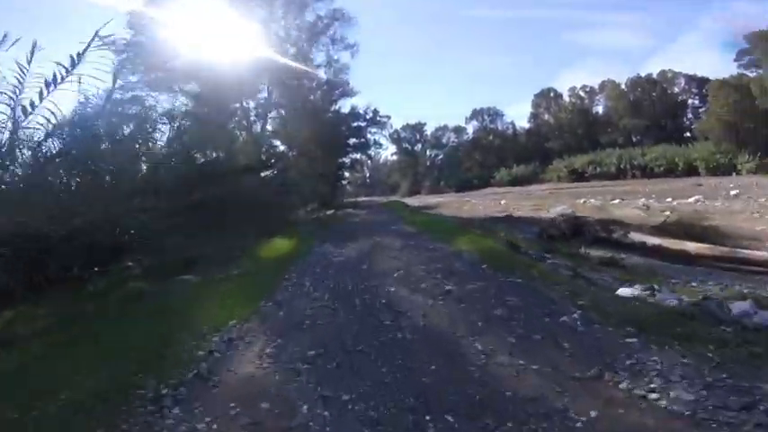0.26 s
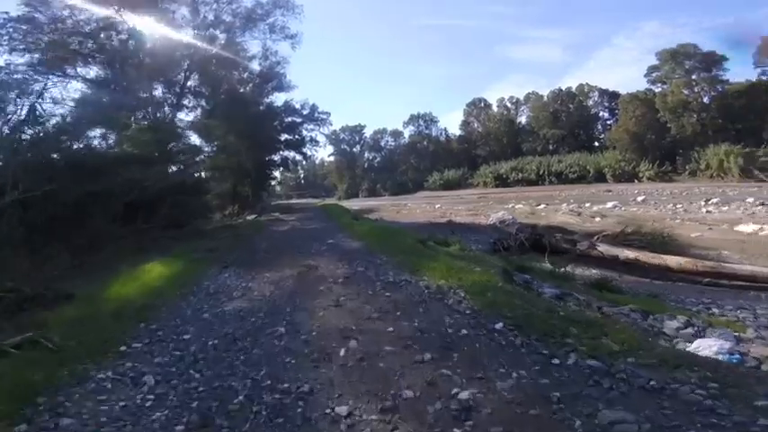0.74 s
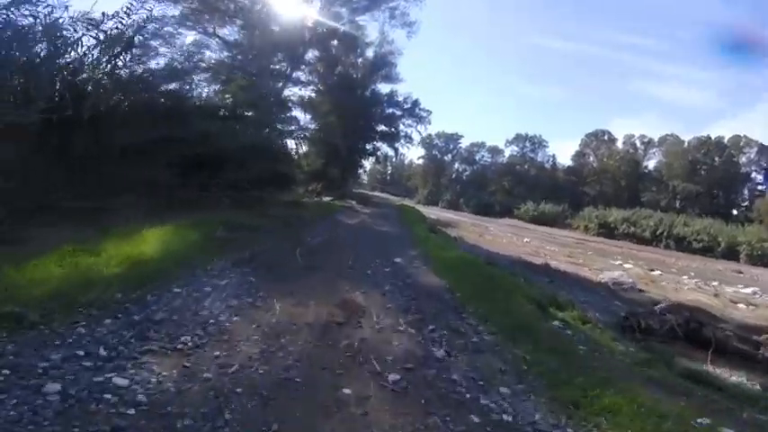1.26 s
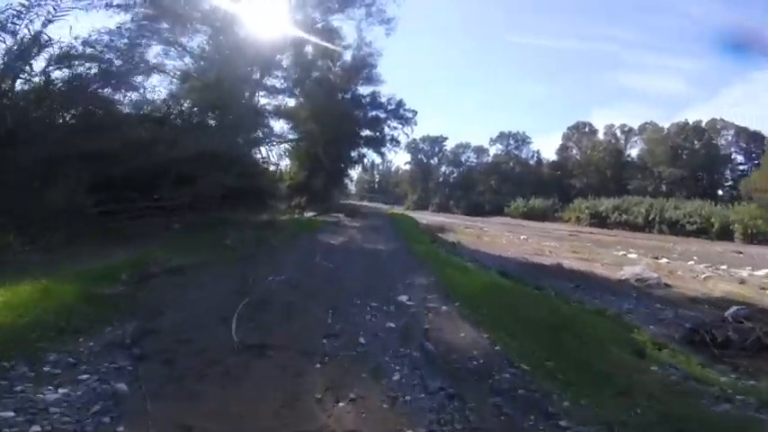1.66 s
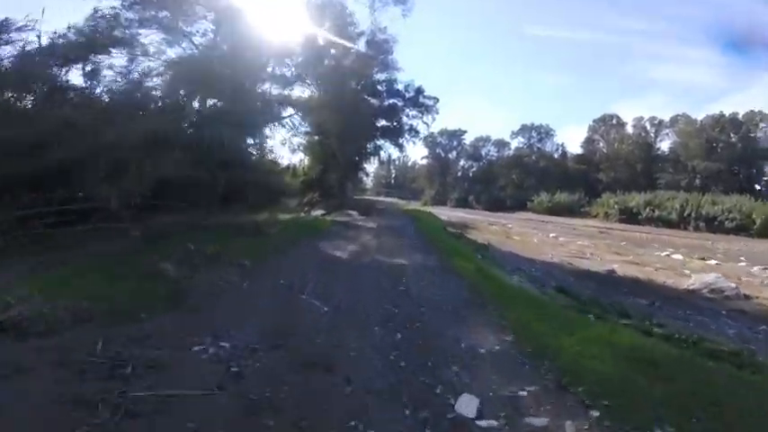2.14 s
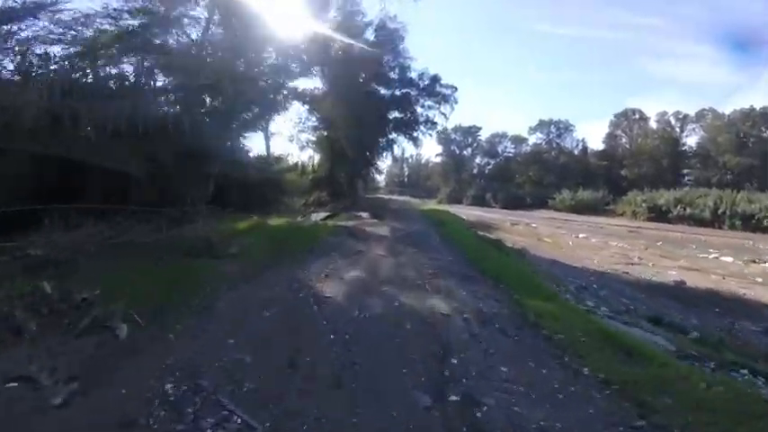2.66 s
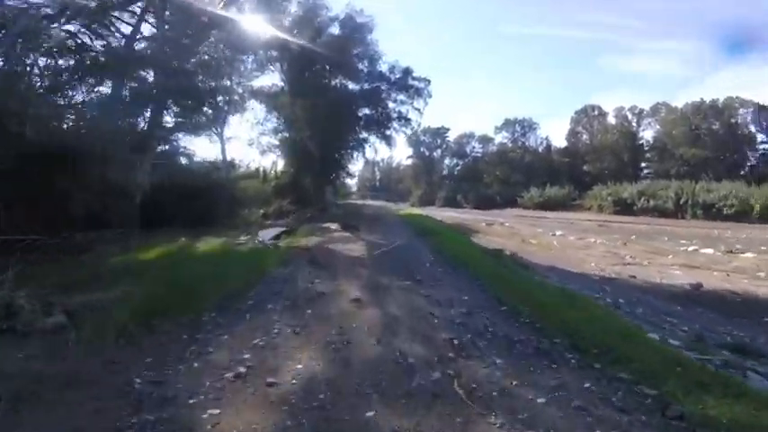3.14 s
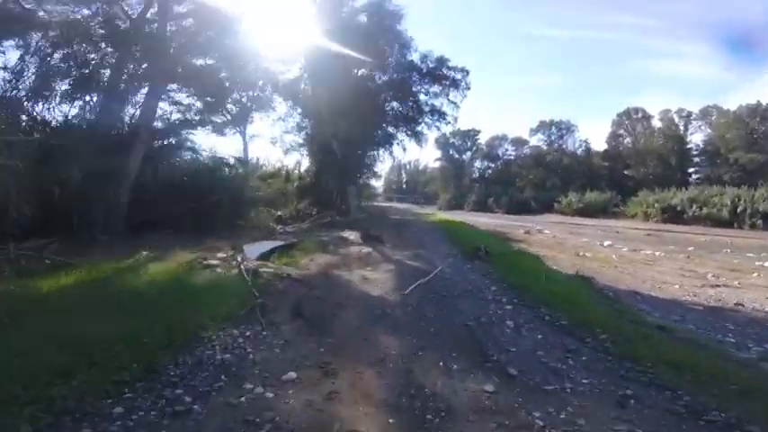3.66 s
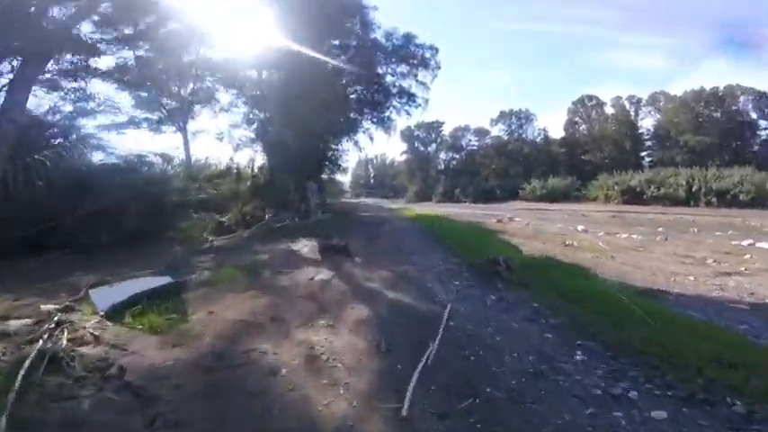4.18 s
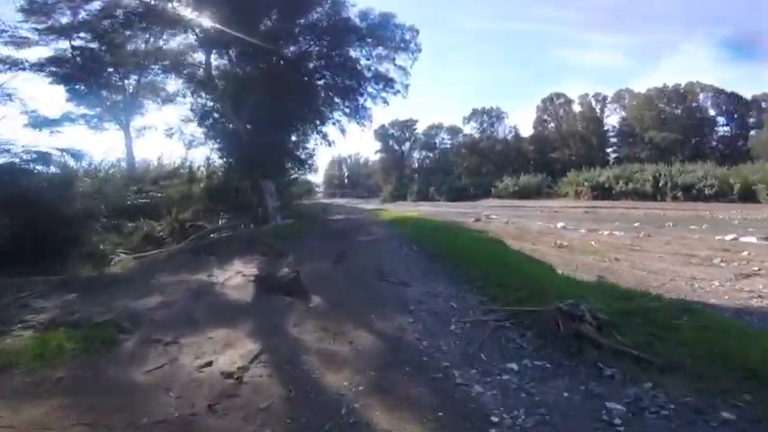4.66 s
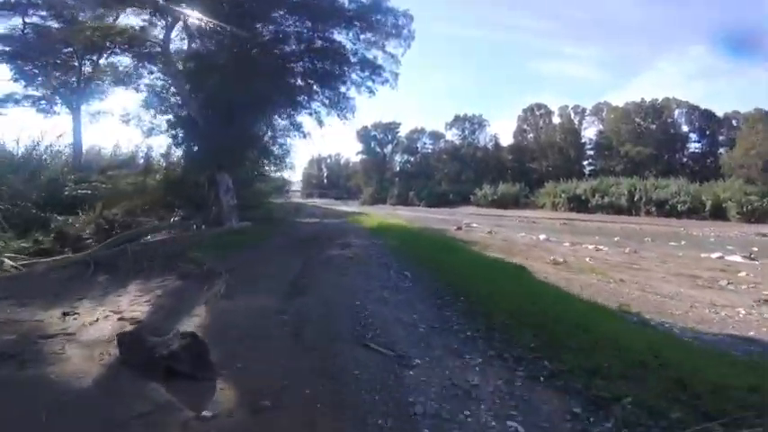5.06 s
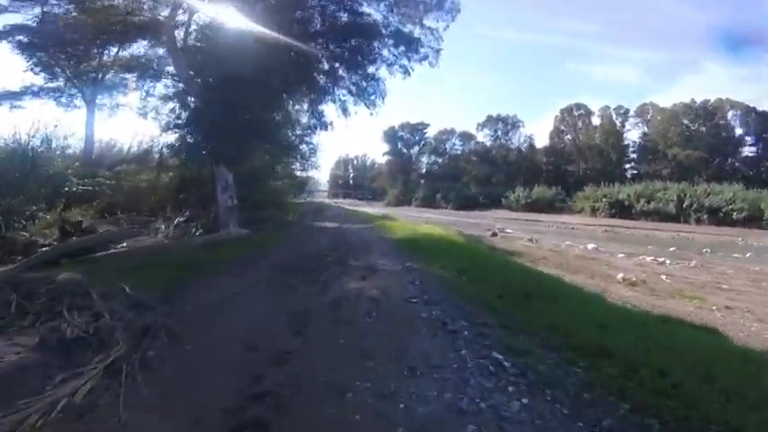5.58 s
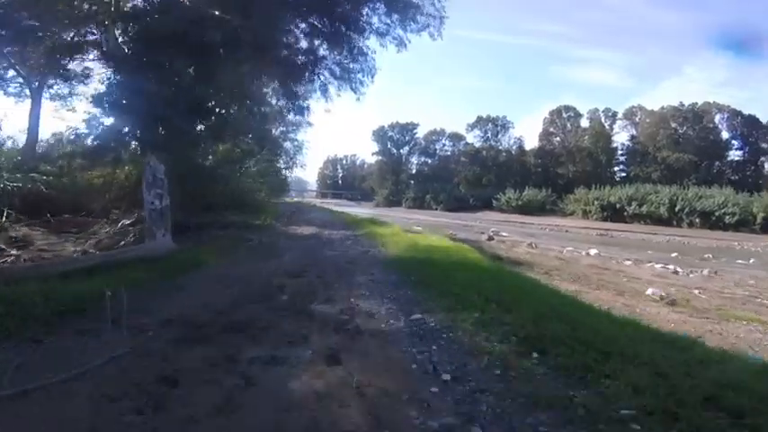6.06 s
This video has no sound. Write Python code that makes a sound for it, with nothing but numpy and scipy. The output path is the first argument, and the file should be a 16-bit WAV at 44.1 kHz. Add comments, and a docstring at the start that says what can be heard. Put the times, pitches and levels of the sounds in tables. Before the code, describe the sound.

A bicycle rolls along a gravel track, heard close up from a microphone fixed to the bike. From start to finish, wind buffets the microphone in low, uneven gusts, the strongest at about 0.3 and 2.5 seconds. The shaking bike rumbles underneath, with a faint hiss and crackle of grit from the tyres. For the first 3.3 seconds the wheels thud often on big stones, in irregular clusters. Hollow plastic knocks, light rattles of loose parts and small clinks of stones on metal are scattered among the thuds. Then the track turns to dirt and the bumps thin out, while the rumble and occasional knocks continue. At about 4.4 seconds comes one loud, sharp tick and a thud, and the rumble briefly dips. A clear knock at 5.6 seconds leads into a last run of bumps and clinks, lasting until about 6.3 seconds.

```python
"""A bicycle rolls along a gravel track, heard by a small microphone clamped to its frame.
From the start, wind buffets the microphone, the fork swings, stones shake the frame and the tyres hiss.
For three seconds big stones thud often, while loose parts rattle, the microphone's housing knocks and
stones clink on metal. Then the track turns to dirt and the bumps thin out. A loud tick comes at 4.4 s,
and a last run of bumps fills the final half second."""
import sys
import numpy as np
from scipy import signal
from scipy.io import wavfile
from scipy.ndimage import uniform_filter1d

SR = 44100
rng = np.random.default_rng(int(sys.argv[2]) if len(sys.argv) > 2 else 0)


def file_out(sig):
    """Save sig as 16-bit WAV at sys.argv[1]."""
    # one column per channel
    cols = np.atleast_2d(sig).T
    # limit, then scale
    lim = np.clip(cols, -1, 1)
    pcm = np.round(lim * 32767).astype(np.int16)
    wavfile.write(sys.argv[1], SR, pcm)


N = 278268


def amp(db):
    """Turn decibels into a number to multiply by."""
    return 10 ** (np.asarray(db) / 20)


def unit(x):
    """Scale a sound so that its average power is 1."""
    return x / np.sqrt(np.mean(x ** 2) + 1e-20)


def curve(rows):
    """Join (time, value) points with straight lines."""
    return np.interp(np.arange(N) / SR, *np.transpose(rows))


def clicks_at(times_s, sizes):
    """Silence with one click at each given time."""
    clicks = np.zeros(N)
    clicks[(times_s * SR).astype(int)] = sizes
    return clicks


def fade(clicks, decay_s):
    """Give each click a tail that dies away."""
    return signal.lfilter([1], [1, -np.exp(-1 / (decay_s * SR))], clicks + 1e-18)


def resonate(x, hz, width_hz):
    """Keep the sound near one pitch; a narrower width rings longer."""
    r = np.exp(-np.pi * width_hz / SR)
    feedback = [1, -2 * r * np.cos(2 * np.pi * hz / SR), r * r]
    return signal.lfilter(np.array([1, 0, -1]) * (1 - r * r) / 2, feedback, x)


def ring(clicks, hz, ring_s):
    """Each click starts a pure tone that falls by 60 dB in ring_s."""
    r, w = amp(-60 / (ring_s * SR)), 2 * np.pi * hz / SR
    return signal.lfilter([0, np.sin(w)], [1, -2 * r * np.cos(w), r * r], clicks + 1e-18)


def keep(x, hz, kind, order=2):
    """Keep the "low" part, the "high" part or one "band" of a sound."""
    return signal.sosfilt(signal.butter(order, hz, kind, fs=SR, output="sos"), x)


def drift(rate_hz):
    """A smooth random wobble, about 1 in size."""
    return unit(keep(rng.standard_normal(N + SR), rate_hz, "low")[SR:])


def grains(per_s, spread_db):
    """Random clicks, a few much larger than the rest."""
    sizes = amp(spread_db * np.minimum(rng.exponential(1, N), 4.0)) * rng.choice([-1, 1], N)
    return sizes * (rng.random(N) < per_s / SR) + 1e-18


def even(x, window_s):
    """Even out slow changes in loudness."""
    window = int(window_s * SR)
    power = uniform_filter1d(uniform_filter1d(x ** 2, window), window)
    return x / np.sqrt(power + 0.018 * np.mean(power))


def swells(base_db, events):
    """A level in dB with smooth swells added; a swell's length is taken at half its height."""
    t, power = np.arange(0, N + 64, 64) / SR, 0
    for s, db, length_s in events:
        power = power + amp(2 * db) * 0.5 ** (2 * (2 * (t - s) / length_s) ** 2)
    return 10 * np.log10(amp(2 * base_db) + np.interp(np.arange(N) / SR, t, power))


def crunch(events, below_db, decay_s, high_hz):
    """Each blow cracks and scatters grit: a rough burst that dies quickly."""
    times_s, level_db = np.transpose(events)[:2]
    loudness = fade(clicks_at(times_s, amp(level_db - below_db)), decay_s)
    burst = loudness * unit(grains(9000, spread_db=9.5))
    return keep(keep(burst, high_hz, "low", order=3), 600, "high")


def notes(events, tones, rise_s, spread_db):
    """Each hit is a few clashing tones that swell and die; all but the first vary from hit to hit."""
    out, t = np.zeros(N), np.arange(SR // 20) / SR
    shape = (t / rise_s) ** 2 * np.exp(2 - 2 * t / rise_s)
    chance = rng.standard_normal((len(events), len(tones), 2))
    chance[:, 0] = 0
    for (s, level_db, hz), luck in zip(events, chance):
        note = 0
        for (ratio, db), (louder, higher) in zip(tones, luck):
            tone_hz = hz * ratio * (1 + 0.13 * higher)
            note = note + amp(db + spread_db * louder) * np.sin(2 * np.pi * tone_hz * t)
        at = int(s * SR)
        out[at:at + len(t)] += (amp(level_db) * note * shape)[:N - at]
    return out


# The top of each gust: t/s, level/dB
GUSTS = [(0.333, -15), (0.647, -24.5), (0.953, -20.5), (1.545, -18.5), (2.099, -23.5), (2.504, -16.5),
         (3.123, -32), (3.206, -19), (3.838, -25.5), (4.337, -22), (5.524, -24), (5.685, -21),
         (5.791, -22.5), (6.284, -20.5)]

def wind(rough_db, patches_db):
    """Wind presses on the microphone's opening in low, uneven lumps."""
    gusts = [(s, db, 0.097) for s, db in GUSTS]   # each lasts 0.097 s
    level_db = swells(-27.5 + 0.27 * rough_db, gusts) + patches_db
    rumble = keep(rng.standard_normal(N), 67.7, "low", order=4)
    return amp(level_db) * even(keep(rumble, 15.0, "high"), window_s=0.047)


FORK_HZ, FORK_WIDTH_HZ = 76.97, 17
# The top of each big swing of the fork: t/s, level/dB, length/s
FORK_SWINGS = [(0.337, -18.5, 0.092), (0.809, -16, 0.041), (0.994, -18.5, 0.08), (1.196, -17, 0.029),
               (1.422, -14, 0.032), (1.539, -14, 0.039), (2.412, -15.5, 0.049), (2.818, -22, 0.11),
               (3.533, -22, 0.14), (3.78, -21, 0.033), (5.366, -15.5, 0.043), (5.626, -21, 0.019),
               (5.878, -15.5, 0.034), (5.99, -19.5, 0.058)]

def fork(rough_db):
    """Kicked by the ground, the fork that holds the front wheel swings at its own low pitch."""
    level_db = swells(-30.5 + rough_db, FORK_SWINGS)
    kicks = resonate(grains(300, spread_db=3.0), FORK_HZ, FORK_WIDTH_HZ)
    return amp(level_db) * even(resonate(kicks, FORK_HZ, 25), window_s=0.088)


# The pitches at which the frame rings: f/Hz, width/Hz, level/dB
FRAME_TONES = [(136, 46.6, -2), (171.2, 30.9, 2.5), (220.4, 42.7, -4), (298.5, 79.8, -6.5),
               (393.3, 112.4, -13.5), (644, 44, -19), (770, 700, -31)]

def frame(force):
    """A push rings all the frame's tones at once, every second one upside down."""
    return sum((-1) ** k * amp(db) * resonate(force, hz, width_hz)
               for k, (hz, width_hz, db) in enumerate(FRAME_TONES))


def gravel(shake_db):
    """Small stones push softly on the tyres, in clumps, and make the frame rumble."""
    stones = grains(700 * amp(3.4 * drift(15)), spread_db=2.0)
    pushes = keep(stones, 996, "low", order=4)
    return amp(shake_db + 2.5) * even(frame(pushes), window_s=0.59)


def tread(level_db):
    """The knobs of the tyre hum evenly through the frame's two highest tones."""
    noise = rng.standard_normal(N)
    hum = sum(amp(db) * resonate(resonate(noise, hz, width_hz), hz, 2 * width_hz)
              for hz, width_hz, db in FRAME_TONES[5:])
    return amp(level_db) * unit(hum)


# How strong the hiss is from low to high: f/Hz, level/dB
HISS_COLOUR = [(1200, -7.5), (1410, -6), (4470, -20), (5040, -26), (6530, -24.5), (10100, -39.5),
               (12000, -62), (13000, -51)]

def hiss(level_db):
    """Fine grit hisses under the tyres, flickering in bands half an octave wide."""
    out, shared_flicker = 0, drift(20)
    edges_hz = 1100 * 2 ** np.arange(0, 4, 0.5)
    noise = rng.standard_normal((2, N))
    grit = noise + 0.11 * unit(grains(500 * amp(2.0 * drift(14)), spread_db=2.5))
    hz, db = np.transpose(HISS_COLOUR)
    for k, (low, high) in enumerate(zip(edges_hz, edges_hz[1:])):
        band_db = np.interp(np.log(low * high) / 2, np.log(hz), db)
        flicker_db = 1.2 * shared_flicker + 1.3 * drift(40)
        out = out + amp(band_db + flicker_db) * keep(grit[k % 2], [low, high], "band")
    hollow = amp(6) * resonate(out, hz=6600, width_hz=580)   # the air just inside the opening rings
    return amp(level_db) * unit(out + hollow)


def pebbles(shake_db):
    """Small stones crackle in clusters under the tyres, each ringing very briefly."""
    cluster = amp(5 * drift(12))
    rings = sum(ring(grains(70 * cluster, spread_db=5.5), hz, ring_s=5.2 / hz)
                for hz in np.geomspace(1400, 4200, num=8))
    return amp(shake_db - 41) * unit(keep(keep(rings, 3200, "low"), 1400, "high"))


# A wheel hits a big stone; rounder stones give a lower f and a softer thud: t/s, level/dB, f/Hz
BUMPS = [(0.0222, -8, 270), (0.2236, -19.5, 600), (0.2387, -13.5, 245), (0.2461, -12, 250),
         (0.2531, -12, 214), (0.2639, -13, 200), (0.31, -17.5, 354), (0.316, -11.5, 444),
         (0.3782, -18.5, 388), (0.4121, -22, 349), (0.4552, -18, 450), (0.567, -19.5, 400),
         (0.8762, -10, 396), (0.929, -8.5, 423), (0.985, -14.5, 395), (1.178, -22.5, 347),
         (1.2243, -15, 347.6), (1.259, -10.5, 407), (1.282, -17, 400), (1.4779, -12.5, 388),
         (1.7061, -15, 386), (2.005, -15, 344), (2.0553, -12, 475), (2.09, -9.5, 420), (2.1762, -16.5, 336),
         (2.255, -21, 324), (2.3155, -11, 260), (2.3555, -15, 305), (2.392, -7.5, 276), (2.4939, -9.5, 397),
         (2.815, -18.5, 360), (2.833, -11.5, 387), (3.035, -23.5, 560), (3.1054, -9.5, 424),
         (3.152, -11, 300), (3.1792, -12, 443), (3.29, -16.5, 315), (3.3284, -19.5, 292),
         (4.3262, -21.5, 347), (4.4152, -10, 370), (5.7064, -15.5, 300), (5.8735, -22, 306),
         (5.9749, -15.5, 373), (5.996, -18.5, 400), (6.122, -21.5, 290), (6.1823, -11, 297),
         (6.2084, -14.5, 388), (6.245, -24, 253)]

def bumps():
    """A big stone thuds: the tyre springs back, frame and fork ring a little, and grit crunches."""
    out, click = np.zeros(N + SR), signal.unit_impulse(SR // 8)
    chance = rng.uniform(-1, 1, (len(BUMPS), 2))
    for (s, level_db, contact_hz), (louder, higher) in zip(BUMPS, chance):
        push = -keep(keep(click, contact_hz, "low"), 2.9 * contact_hz, "low", order=4)
        tyre = resonate(push, hz=127.96, width_hz=92)
        tube = amp(-13 + 4 * louder) * resonate(push, hz=700 * (1 + 0.1 * higher), width_hz=170)
        thud = tyre + 0.038 * frame(push) + tube + 2.5 * resonate(push, FORK_HZ, FORK_WIDTH_HZ)
        at = int(s * SR) - np.argmin(thud)   # the wave's deepest dip lands on the listed time
        out[at:at + len(thud)] += amp(level_db) * thud / -thud.min()
    return out[:N] + crunch(BUMPS, below_db=43.5, decay_s=0.017, high_hz=2750)


# The tones of the loose parts: f/Hz, level/dB, ring time/s
PART_TONES = [(3850, -3.5, 0.0096), (4530, -0.5, 0.011), (5220, 2.5, 0.0076), (6470, 2.5, 0.015)]
# Loose parts touch: t/s, level/dB
RATTLES = [(0.0458, -44), (0.146, -57), (0.224, -46.5), (0.24, -53), (0.3323, -50.5), (0.5125, -51),
           (0.602, -59), (0.787, -58), (0.9467, -52), (0.957, -58.5), (1.11, -49.5), (1.123, -66),
           (1.1666, -60), (1.2387, -46.5), (1.367, -66), (1.4423, -50.5), (1.6103, -63), (1.65, -61),
           (1.743, -51.5), (1.763, -59), (1.802, -60), (2.011, -62), (2.086, -48), (2.182, -59.5),
           (2.357, -56), (2.4229, -61), (2.4453, -50.5), (3.1996, -62), (3.31, -51), (3.5942, -56),
           (3.6363, -58), (3.7105, -57), (3.952, -53), (5.765, -53), (6.269, -53), (6.04, -58)]

def rattles(shake_db):
    """Loose parts ring with a new mix of tones at each touch; faint touches follow the shaking."""
    times_s, level_db = np.transpose(RATTLES)
    strength_db = rng.uniform(-11, 1, (len(RATTLES), len(PART_TONES)))
    faint = amp(shake_db - 44.0) * grains(120 * amp(5 * drift(22)), spread_db=2.5)
    out = 0
    for k, (hz, db, ring_s) in enumerate(PART_TONES):
        touches = faint * amp(2.8 * rng.standard_normal(N))
        touches += clicks_at(times_s, amp(level_db + strength_db[:, k]))
        out = out + amp(db) * ring(keep(touches, 1.07 * hz, "low"), hz, ring_s)
    return out + crunch(RATTLES, below_db=11.5, decay_s=0.0055, high_hz=7500)


# The tones in one knock: multiple of its pitch, level/dB
KNOCK_TONES = [(1, 0.5), (0.72, -9), (1.5, -12.5)]
# The housing hits its clamp, plus a few clear pings near 1.5 kHz (3.398, 4.026, 4.343 s): t/s, level/dB, f/Hz
KNOCKS = [(0.172, -33, 1084), (0.311, -38, 1050), (0.415, -44.5, 1070), (0.451, -40, 960),
          (0.511, -33.5, 1094), (0.533, -43.5, 890), (0.557, -38, 1060), (0.651, -37.5, 1040),
          (0.784, -41, 1080), (0.949, -38, 800), (0.984, -37, 810), (1.068, -39.5, 1090), (1.237, -42, 925),
          (1.472, -34.5, 895), (1.591, -36.5, 1010), (1.762, -40, 1144), (1.82, -45.5, 950),
          (2.007, -40.5, 1000), (2.049, -37, 860), (2.09, -44, 854), (2.107, -38, 820), (2.143, -44, 690),
          (2.3, -41.5, 880), (2.395, -40, 1100), (2.42, -38.5, 1084), (2.445, -37, 1160), (2.469, -37, 970),
          (2.692, -34, 1080), (2.829, -28.5, 1035), (3.141, -29.5, 970), (3.398, -41.5, 1540),
          (3.5, -35, 736), (3.532, -34.5, 1047), (3.968, -36, 1075), (4.026, -48, 1590), (4.343, -41, 1390),
          (4.813, -36.5, 1010), (5.971, -39.5, 890), (5.594, -27.5, 1030), (6.268, -37.5, 1090)]

def knocks(shake_db):
    """The plastic housing knocks, hollow and rough, with a few clear pings among them; small random knocks
    follow the shaking."""
    small = sum(resonate(resonate(grains(110, spread_db=6.5), hz, 100), hz, 230)
                for hz in (880, 1020, 1170))
    edge = crunch(KNOCKS, below_db=17, decay_s=0.008, high_hz=1900)
    hollow = notes(KNOCKS, KNOCK_TONES, rise_s=0.0024, spread_db=-1.0)
    return hollow + edge + amp(shake_db - 28.0) * unit(small)


# The tones in one clink: multiple of its pitch, level/dB
CLINK_TONES = [(1, 2), (1.45, -3), (0.72, -4), (2.0, -8)]
# A stone hits metal: t/s, level/dB, f/Hz
CLINKS = [(.1825, -44, 1750), (.3158, -50, 1450), (.475, -61, 1470), (.7495, -49, 1680), (.786, -61, 1980),
          (.9305, -53, 2570), (1.431, -55, 2390), (1.5185, -57, 1740), (2.1094, -48, 1520),
          (2.3398, -47, 1700), (2.4233, -58, 2190), (2.9955, -52, 2500), (3.4115, -56, 2400),
          (3.4795, -53, 2080), (3.698, -60, 3600), (3.7185, -54, 2280), (4.3453, -51, 1600),
          (5.2885, -56.5, 2800), (5.4595, -63, 2530), (5.741, -59, 2770), (5.937, -49.5, 2440),
          (6.245, -60, 2620), (6.268, -42, 1970)]

def clinks():
    """Stones strike the rim and tubes, each with a short bright note and a crunch."""
    ringing = notes(CLINKS, CLINK_TONES, rise_s=0.0008, spread_db=3.0)
    return ringing + crunch(CLINKS, below_db=0, decay_s=0.009, high_hz=3300)


# Sharp ticks and the dip in loudness after each (none if below zero): t/s, level/dB, dip/dB
TICKS = [(0.2262, -36, -3.5), (0.2664, -27.5, 3), (0.8738, -35.5, 3), (1.481, -29, 2), (1.579, -37.5, -1.5),
         (1.708, -40, 6.5), (2.409, -43, -2.5), (2.4427, -39, 10.5), (2.5083, -44, 2), (4.362, -15.5, 9.5)]

def ticks():
    """A sharp, one-sided tick that dies within milliseconds, often as the loudness suddenly drops."""
    times_s, level_db, _ = np.transpose(TICKS)
    tick = fade(clicks_at(times_s, -amp(level_db)), decay_s=0.0016)
    return keep(tick, 8400, "low")


def dips():
    """A volume control that falls at most ticks and creeps back."""
    times_s, _, dip_db = np.transpose(TICKS)
    falls_db = fade(clicks_at(times_s, np.clip(dip_db, 0, 20)), decay_s=0.16)
    return amp(-uniform_filter1d(falls_db, size=40))


# Spells of chatter: start t/s, end t/s
CHATTER_SPELLS = [(.398, .465), (.49, .535), (.73, .8), (.89, .98), (1.016, 1.05), (1.165, 1.21),
                  (1.545, 1.585), (2.59, 2.62), (2.8, 2.86), (4.422, 4.436), (4.498, 4.575)]

def chatter():
    """A small metal part taps once per swing of the fork, a little uneven in time and strength."""
    taps, hz, width_hz = np.zeros(N), PART_TONES[1][0], 1500
    for start, end in CHATTER_SPELLS:
        later, louder = rng.standard_normal((12, 2)).T
        times_s = start + np.arange(12) / FORK_HZ + 0.001 * later
        inside = times_s < end
        taps += clicks_at(times_s[inside], amp(-79 + 4 * louder[inside]))
    softened = resonate(taps + 1e-18, hz, width_hz)
    return ring(softened, hz, ring_s=0.007) * SR / (np.pi * width_hz)


def shaking(ground_db):
    """How hard the bicycle shakes, in dB: the rough track plus a brief shudder after each bump."""
    times_s, level_db, _ = np.transpose(BUMPS)
    shudder = fade(clicks_at(times_s, amp(2 * (level_db - 16.5))), decay_s=0.015)
    return 10 * np.log10(amp(2 * ground_db) + keep(shudder, 40, "low", order=1))


# How rough the track is between bumps: t/s, level/dB
ROUGHNESS = [(0.0, -36.5), (0.26, -31.5), (0.39, -29), (0.93, -34), (1.44, -31), (1.7, -39), (1.93, -35.5),
             (2.18, -38.5), (2.46, -28.5), (3.0, -34.5), (3.09, -43.5), (3.27, -33), (3.69, -32),
             (3.87, -33), (4.08, -32.5), (4.27, -29.5), (4.44, -31), (4.71, -35.5), (5.25, -33),
             (5.41, -31.5), (5.76, -28.5), (6.04, -30.5), (6.31, -27)]
# How much patches of loose stones make the level wobble, less as the track turns to dirt: t/s, wobble/dB
LOOSE_STONES = [(0, 2.0), (3.4, 1.6), (4.0, 0.8)]
# The basic loudness of the tyres' hiss and hum: t/s, level/dB
TYRE_LEVEL = [(0.0, -66), (0.46, -69), (0.68, -65), (1.07, -66.5), (1.37, -68), (1.74, -67.5),
              (2.02, -68.5), (2.23, -66), (2.62, -66), (3.55, -64.5), (3.85, -63), (4.2, -63.5),
              (4.39, -69), (4.71, -67), (5.39, -63), (6.12, -62.5), (6.31, -61.5)]

def scene():
    """The track sets how hard everything shakes, and all the sounds meet at one microphone."""
    ground_db = curve(ROUGHNESS)
    rough_db = ground_db - ground_db.mean()
    patches_db = curve(LOOSE_STONES) * drift(19.4)
    shake_db = shaking(ground_db) + patches_db
    tyre_db = curve(TYRE_LEVEL) + 0.25 * (shake_db - shake_db.mean())   # rougher ground hisses more
    rumble = wind(rough_db, patches_db) + fork(rough_db) + gravel(shake_db)
    tyres = tread(tyre_db) + hiss(tyre_db) + pebbles(shake_db)
    hits = clinks() + bumps() + knocks(shake_db) + rattles(shake_db) + ticks() + chatter()
    return (dips() * (rumble + tyres) + hits)[None]


def record(dry):
    """The loudest peaks are rounded off and the very highest sounds are cut."""
    rounded = 0.56 * np.tanh(dry / 0.63)
    return signal.sosfilt(signal.cheby2(10, 50, 14500, fs=SR, output="sos"), rounded)


dry = scene()
out = record(dry)
file_out(out)
```